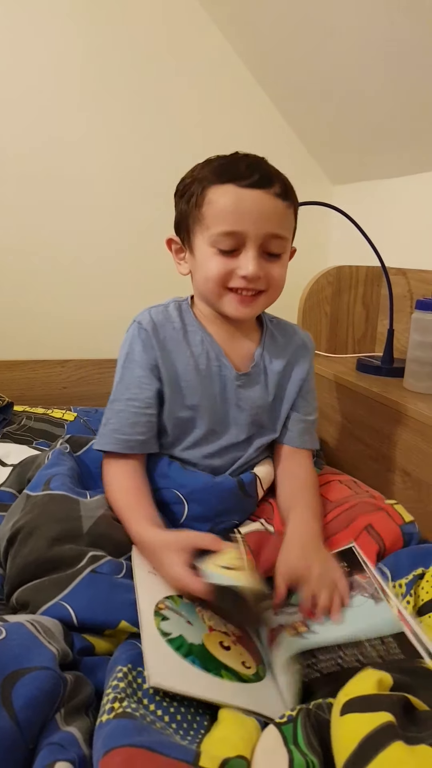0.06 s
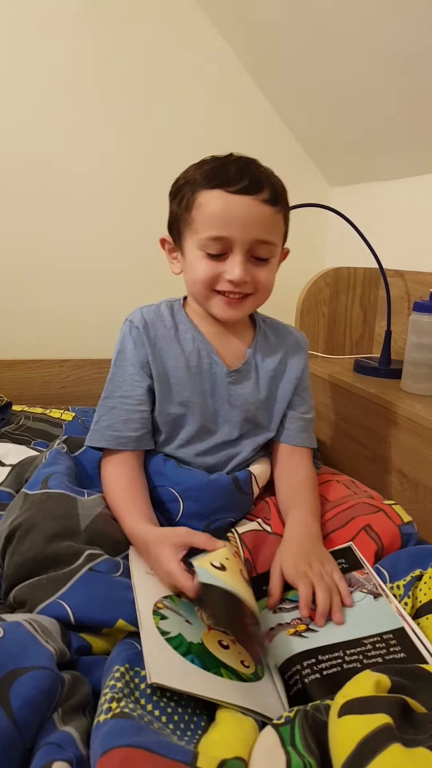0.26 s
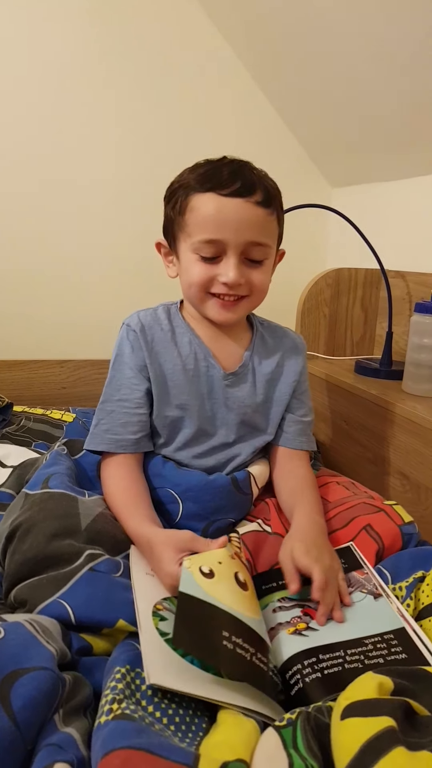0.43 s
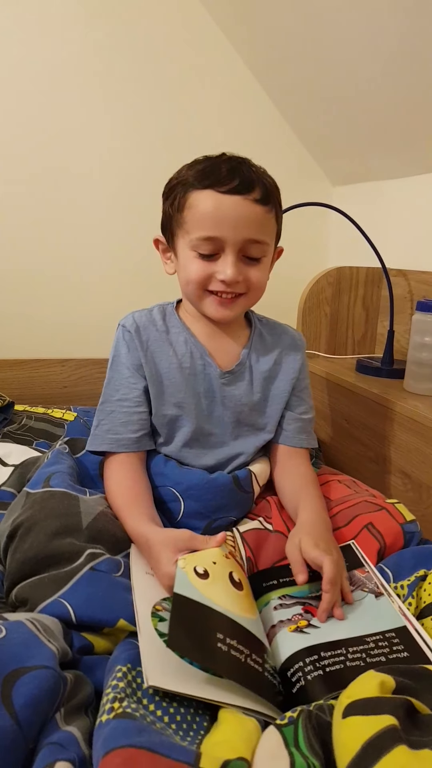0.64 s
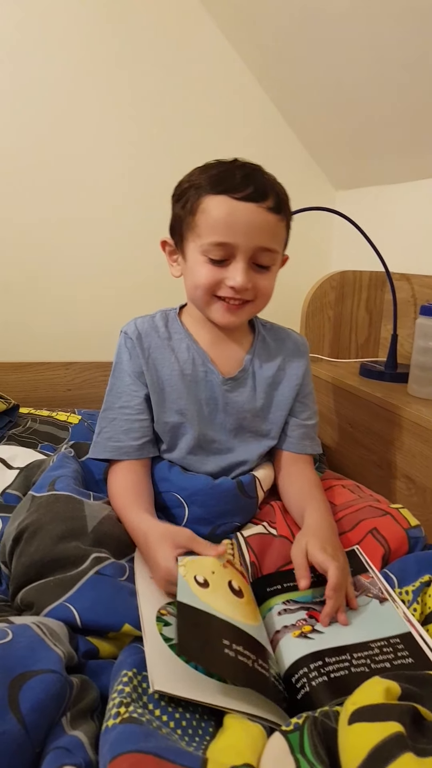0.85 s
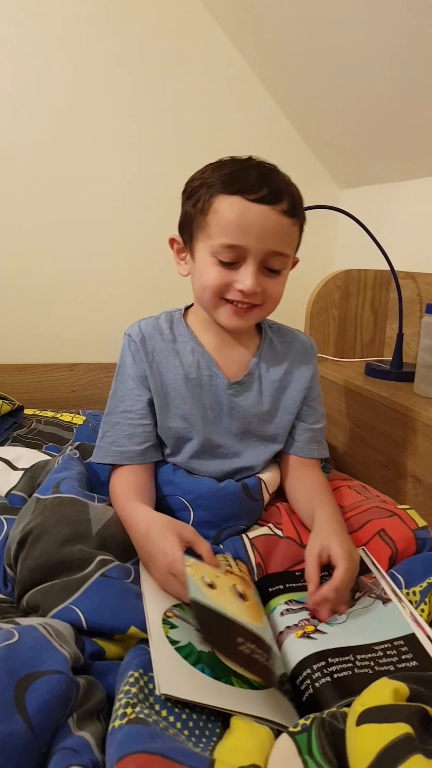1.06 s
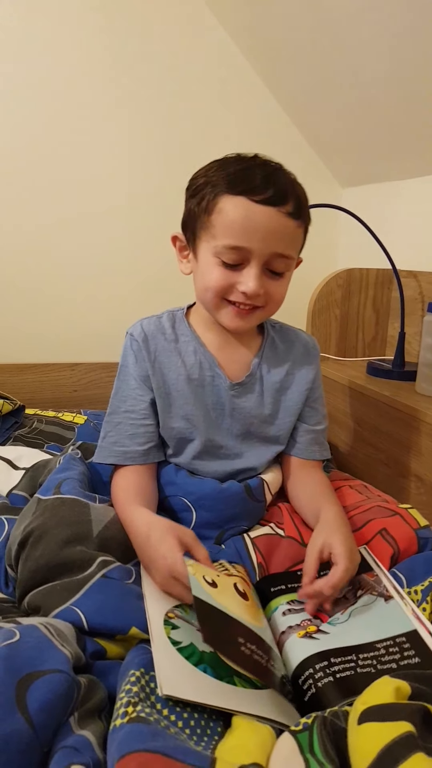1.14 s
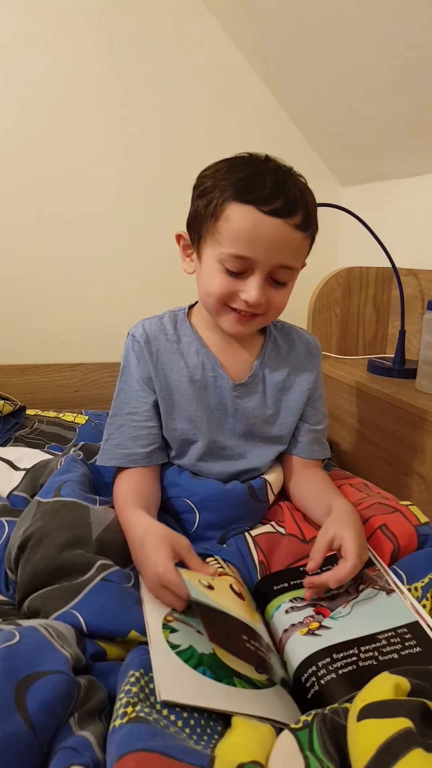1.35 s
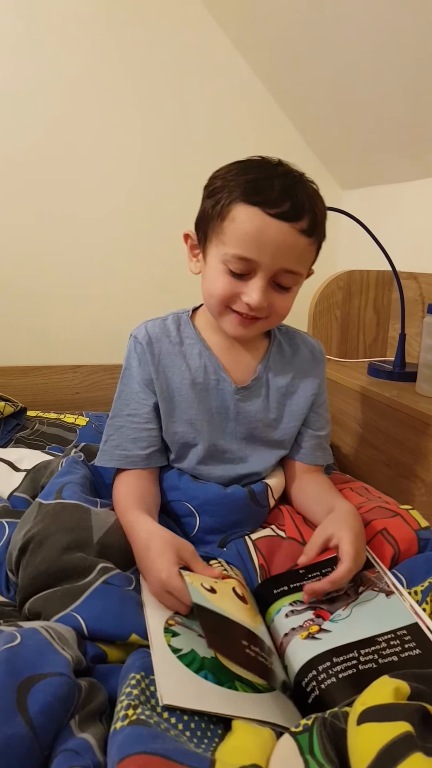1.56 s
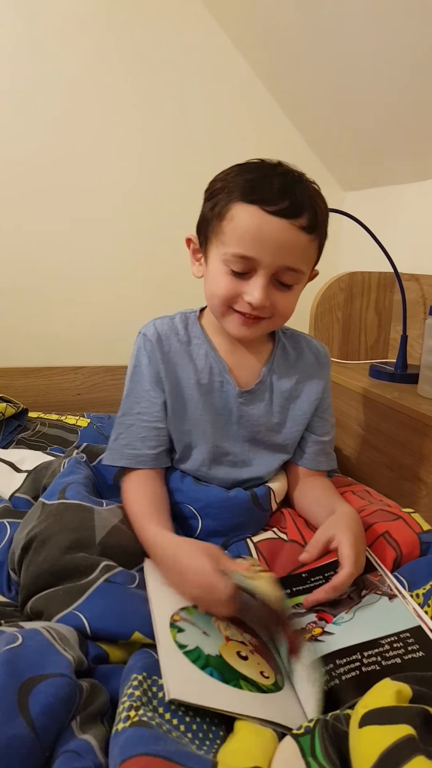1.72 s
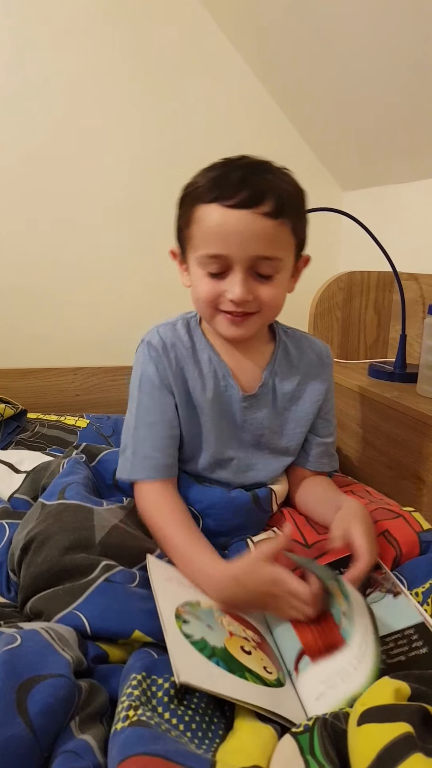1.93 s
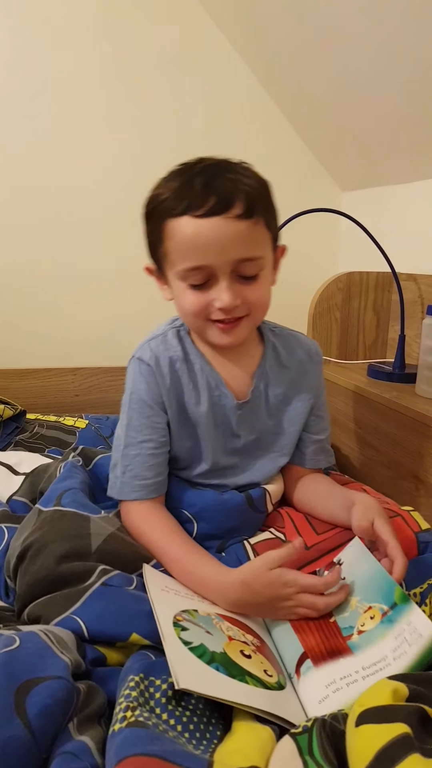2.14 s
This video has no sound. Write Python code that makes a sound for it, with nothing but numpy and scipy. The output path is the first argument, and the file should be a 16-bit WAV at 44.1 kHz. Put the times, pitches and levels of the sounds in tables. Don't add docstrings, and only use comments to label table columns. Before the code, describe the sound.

Thin book pages are handled on a bed: faint rubbing and small crease clicks, then denser crumpling, then louder quick page flaps. Small soft bedroom, close phone microphone, slight hiss.

```python
import sys
import numpy as np
from scipy import signal
from scipy.fft import rfft, irfft
from scipy.io import wavfile
from scipy.ndimage import uniform_filter1d, map_coordinates

SR = 44100
rng = np.random.default_rng(int(sys.argv[2]) if len(sys.argv) > 2 else 0)


def to_linear_factor(level_db):
    exponent = np.asarray(level_db, float) / 20
    return 10 ** exponent


def generate_wav(sig):
    pcm = np.round(np.clip(np.atleast_2d(sig).T, -1, 1) * 32767).astype(np.int16)
    wavfile.write(sys.argv[1], SR, pcm)


N = 96138

# t/s, level/dB, brightness/dB
RUB = [(0, -60.5, 1), (0.029, -61.5, -13), (0.099, -64, -3.5), (.16, -84, -11), (.232, -108, -14),
       (.25, -73.5, 11), (0.409, -63.5, -6.5), (.68, -72.5, -7.5), (.83, -57, 1.5), (1.001, -72.5, 7.5),
       (1.16, -72.5, 7), (1.318, -58, 3.5), (1.43, -75, -7.5), (1.65, -74, -3.5), (1.72, -48.5, 5.5),
       (1.825, -57, 4), (1.879, -42.5, 4.5), (1.96, -57, 12)]
# t/s, body/dB, thump/dB, crack/dB, fizz/dB
SNAPS = [(.018, -87, -67, -75, -49.5), (0.0575, -44, -67, -63, -66), (0.0801, -38, -60, -61.5, -56),
         (0.244, -55.5, -66, -72.5, -60), (0.335, -74, -83, -86, -77), (0.3614, -52, -87, -65, -81),
         (0.401, -41.5, -74, -64, -67), (0.4407, -33.5, -45.5, -53.5, -63),
         (0.4821, -34, -41.5, -50.5, -67), (0.5818, -37.5, -42.5, -55, -67), (0.738, -52, -66, -63, -82),
         (0.7861, -35.5, -50, -46, -61), (0.8169, -39.5, -47, -65, -70), (0.9021, -43.5, -80, -77, -46),
         (1.0511, -49, -61, -93, -84), (1.4993, -32.5, -48.5, -49.5, -64),
         (1.5585, -26.5, -45.5, -48.5, -55), (1.671, -28.5, -43, -49.5, -51)]
# t/s, level/dB
RUMBLE = [(0.0, -91), (0.07, -54.5), (0.21, -78.5), (0.41, -82), (0.49, -52.5), (0.54, -67.5),
          (0.59, -62.5), (0.72, -68.5), (0.82, -100), (1.01, -74.5), (1.4, -74), (1.58, -58), (1.7, -76),
          (1.77, -65), (1.92, -64), (2.18, -71.5)]
# t/s, level/dB, thump/dB, crack/dB, spread/s
CRUMPLES = [(0.26, -60, -23, -4, .002), (0.341, -63, -29, -25, 0.0078), (.378, -57, -15, -11, .01),
            (.42, -57, -15, -20, 0.0057), (.615, -56.5, -10, -24, 0.014), (.7557, -59.5, -16, -10, 0.0035),
            (.82, -50, -14, -15, 0.0014), (.848, -50, 2.5, -19, 0.0031), (.858, -73, 13, -15, 0.0017),
            (.9025, -52, -26, 1, 0.0048), (1.2285, -44.5, -10.5, 0, 0.0027), (1.25, -56, -18, -13, 0.0059),
            (1.277, -57, -22, -23, .005), (1.305, -40.5, -7, -10, 0.0024), (1.321, -47, -9, -23, 0.011),
            (1.3396, -35, -8, -31, 0.0015), (1.35, -56, 2, -10, 0.0026), (1.384, -43, -7, -14, 0.0018),
            (1.392, -49.5, -30, -34, 0.0025), (1.4573, -33.5, -19, -37, 0.002),
            (1.503, -36, -15, -22, 0.0026), (1.513, -34, -14, -40, .002), (1.522, -47, -8, -7, 0.0058),
            (1.5676, -30.5, -15.5, -8, 0.0019), (1.581, -39.5, -19, -23, 0.0076)]
# t/s, level/dB, thump/dB, crack/dB, spread/s
FLAPS = [(1.6928, -30, -9, -12, 0.0018), (1.736, -49, -3, -23, 0.0054), (1.76, -39, -2.5, 10, 0.0033),
         (1.845, -34, -15.5, -7.5, 0.0023), (1.855, -50.5, 9.5, 14.5, 0.00034),
         (1.894, -40.5, -26, -2, 0.0047), (1.9, -41, -17, 13.5, 0.0027), (1.919, -54, 8.5, 8, 0.022),
         (1.9738, -32.5, -10, 4, 0.0037), (2.012, -42, 7, -12, 0.00091), (2.0184, -25.5, -17, -7.5, 0.0035),
         (2.034, -31, -12.5, -18, 0.0028), (2.058, -50, -35, 4.5, 0.016)]

# thump, body, crack, fizz [level/dB]
RUB_LAYERS_DB = [-2, 6, -5, -8]
SNAP_LAYERS_DB = [18.2, 16.2, 24.1, 11]
CRUMPLE_LAYERS_DB = [1.1, 4.7, 1.5, -7]
FLAP_LAYERS_DB = [2, 0, 1.5, -19.5]

# f/Hz, level/dB
HELD_THUMP = [(110, -42.5), (250, 4.5), (450, -0.5), (700, 11.5), (950, 6.5), (1400, -40.5)]
# f/Hz, level/dB
FREE_THUMP = [(140, -19.5), (230, -0.5), (330, -7), (420, -12.5), (600, -1.5), (850, -5.5), (1400, -32)]
# f/Hz, level/dB
HELD_BODY = [(600, -14), (1120, -7), (1330, 3.5), (1550, 3.5), (2400, -0.5), (3100, -10.5), (4500, -23)]
# f/Hz, level/dB
FREE_BODY = [(600, -25.5), (1050, -9), (1300, 3), (1750, 15.5), (2450, 12.5), (2900, -3.5), (4500, -24)]
# f/Hz, level/dB
FLYING_BODY = [(600, -28.5), (1000, -8), (1400, -1.5), (2000, 5), (2700, -1.5), (3300, -2.5), (5000, -28.5)]
# f/Hz, level/dB
CRACK = [(900, -24), (2200, 8), (3200, 5), (4400, 7), (6200, -1.5), (8500, -2), (11000, -23.5)]
# f/Hz, level/dB
SWISH = [(900, -32), (2300, -12.5), (3000, 1.5), (4300, 4.5), (6200, 6.5), (8000, -1), (11000, -11)]
# f/Hz, level/dB
SLAP = [(500, -50.5), (1500, 4.5), (2400, 6.5), (3100, 4.5), (4400, 2.5), (6500, -9), (9000, -20)]
# f/Hz, level/dB
FIZZ = [(2500, -29), (6000, 9.5), (8500, 15), (11000, 11), (13500, 16.5), (15000, -0.5), (17000, -49)]
# f/Hz, level/dB
WHUMP = [(100, -18.5), (190, -3), (300, -0.5), (430, -4.5), (600, -20), (1000, -32.5)]
# f/Hz, level/dB
LOW = [(20, -73), (33, -20), (52, 7), (78, 9.5), (130, -8.5), (250, -19.5)]

# t/s, level/dB, extra delay at right port/s
ECHOES = [(.0011, -11, .0004), (.0021, -12, -.0005), (.0085, -16, -.0002), (.0135, -19, .0003),
          (.019, -21, -.0004)]
# f/Hz, t60/s
ROOM = [(200, .22), (1000, .24), (4000, .2), (12000, .14)]
# f/Hz, level/dB
RIGHT = [(60, 4), (200, 3), (400, -1.5), (800, -2), (1700, 3), (2400, -.5), (3300, 0), (4800, 5), (7000, 5),
         (8800, -3), (13000, 5)]
# f/Hz, level/dB per Hz
HISS = [(60, -9.5), (200, -7.5), (700, -15), (1400, -6.5), (3200, -12.5), (5000, -14), (8500, -24.5),
        (14000, -16)]

HELD_FROM_S, HELD_TO_S, FLIES_S, LANDS_S = .05, 1.15, 1.65, 1.955
GRAIN_DB, GRAINS_PER_S, CLUMP_DB, BRUSH = 2.4, 3500, 2.5, .4
RUB_END_S, RUB_FADE_DB_PER_S = 2.043, 302
SNAP_RISE_S, SNAP_FALL_S, SPLINTERS = .0003, .003, .09
REBOUND_S, REBOUND_SPREAD, REBOUND = .0034, .04, 1.35
WHUMP_S, WHUMP_WIDTH_S, WHUMP_DB = 0.037, 0.021, -50.5
FIZZ_PER_CRACK = 2.38
ROOM_DB = -15
SHARED_BELOW_HZ, MIC_LOW_HZ, EDGE_HZ = 900, 42, 15400
CAVITY_HZ, CAVITY_WIDTH_HZ, CAVITY_DB = 1340, 170, 3.5
LAG_S, LAG_WANDER_S = .00028, .00005
HISS_DB, GATE_DB, GATE_KNEE_DB, GATE_S = -66.5, -6.5, -63, 0.022


def read(points, hz):
    f, value = np.transpose(points)
    return np.interp(np.log(hz + 1), np.log(f + 1), value)


def colour(x, points, lag_s=0.):
    hz = np.fft.rfftfreq(4096, 1 / SR)
    cep = irfft(read(points, hz) * np.log(10) / 20)
    cep[1:2048] *= 2
    cep[2049:] = 0
    taps = irfft(np.exp(rfft(cep) - 2j * np.pi * hz * lag_s))
    return signal.oaconvolve(x, taps)[:N], np.linalg.norm(taps)


def shape_noise(x, points):
    shaped, norm = colour(x, points)
    return shaped / norm


def sheet(drive):
    t = np.arange(N) / SR
    thump, body, crack, fizz = drive
    held = (t > HELD_FROM_S) & (t < HELD_TO_S)
    flying, landed = t > FLIES_S, t > LANDS_S
    parts = [
        (thump * held, HELD_THUMP),
        (thump * ~held, FREE_THUMP),
        (body * held, HELD_BODY),
        (body * (~held & ~flying), FREE_BODY),
        (body * flying, FLYING_BODY),
        (crack * ~flying, CRACK),
        (crack * (flying & ~landed), SWISH),
        (crack * landed, SLAP),
        (fizz, FIZZ),
    ]
    return sum(shape_noise(x, points) for x, points in parts)


def rubbing():
    t = np.arange(N) / SR
    size = to_linear_factor(GRAIN_DB * np.minimum(rng.exponential(1, N), 3.5))
    size *= rng.random(N) < GRAINS_PER_S / SR
    clump = uniform_filter1d(rng.standard_normal(N), 300)
    slips = (size + BRUSH) * rng.standard_normal(N) * to_linear_factor(CLUMP_DB * clump / clump.std())
    at_s, level_db, bright_db = np.transpose(RUB)
    level = np.interp(t, at_s, level_db) - RUB_FADE_DB_PER_S * np.maximum(t - RUB_END_S, 0)
    tilt = np.outer([-1, 0, 1, 1], np.interp(t, at_s, bright_db))
    gain_db = level + tilt + np.array(RUB_LAYERS_DB)[:, None]
    return sheet(slips / slips.std() * to_linear_factor(gain_db))


def add_clicks(drive, s, levels_db, rise_s, fall_s, clump_db, lead=0.):
    span = np.arange(-1024, 2048)
    u = span / SR
    clicks = rng.standard_normal(3072) * to_linear_factor(clump_db * np.repeat(rng.standard_normal(384), 8))
    shape = np.exp(np.where(u < 0, u / abs(rise_s), -u / abs(fall_s)))
    clicks *= shape * np.linalg.norm(shape) / np.linalg.norm(shape * clicks)
    clicks[1024] += lead
    rebound_s = REBOUND_S * (1 + REBOUND_SPREAD * rng.uniform(-1, 1))
    clicks[1024 + round(rebound_s * SR)] += REBOUND * lead
    at = round(s * SR) + span
    drive[:, at[at >= 0]] += to_linear_factor(levels_db)[:, None] * clicks[at >= 0]


def snaps():
    drive = np.zeros((4, N))
    for s, body_db, thump_db, crack_db, fizz_db in SNAPS:
        levels_db = np.array([thump_db, body_db, crack_db, fizz_db]) + SNAP_LAYERS_DB
        levels_db = levels_db + 20 * np.log10(SPLINTERS)
        add_clicks(drive, s, levels_db, SNAP_RISE_S, SNAP_FALL_S, 5.0, 1 / SPLINTERS)
    return drive


def whump():
    t = np.arange(N) / SR
    puff = np.exp(-.5 * ((t - WHUMP_S) / WHUMP_WIDTH_S) ** 2)
    return to_linear_factor(WHUMP_DB) * shape_noise(rng.standard_normal(N) * puff, WHUMP)


def rumble():
    level_db = np.interp(np.arange(N) / SR, *np.transpose(RUMBLE))
    return shape_noise(rng.standard_normal(N), LOW) * to_linear_factor(level_db)


def crumples():
    drive = np.zeros((4, N))
    for s, db, thump_db, crack_db, spread_s in CRUMPLES:
        levels_db = db + np.array([thump_db, 0, crack_db, crack_db]) + CRUMPLE_LAYERS_DB
        add_clicks(drive, s, levels_db, spread_s * .6, spread_s, 3.5)
    return drive


def flaps():
    drive = np.zeros((4, N))
    for s, db, thump_db, crack_db, spread_s in FLAPS:
        levels_db = db + np.array([thump_db, 0, crack_db, FIZZ_PER_CRACK * crack_db]) + FLAP_LAYERS_DB
        add_clicks(drive, s, levels_db, spread_s * 1.33, spread_s, 2.5)
    return drive


def room(x):
    taps = np.zeros((2, SR // 2))
    at = np.arange(100, SR // 2 - 20, 20)
    places = at + rng.integers(0, 20, (2, len(at)))
    np.put_along_axis(taps, places, rng.choice([-1., 1.], (2, len(at))), 1)
    hz, t, z = signal.stft(taps, SR, nperseg=256)
    decay = to_linear_factor(-60 * t / read(ROOM, hz)[:, None])
    tail = signal.istft(z * decay, SR, nperseg=256)[1]
    tail[1] += signal.lfilter(*signal.butter(2, SHARED_BELOW_HZ, fs=SR), tail[0] - tail[1])
    early = np.zeros_like(tail)
    early[:, 0] = 1
    for s, db, extra_s in ECHOES:
        early[[0, 1], [round(s * SR), round((s + extra_s) * SR)]] = to_linear_factor(db)
    both = early / np.linalg.norm(early[0]) + to_linear_factor(ROOM_DB) * tail / np.linalg.norm(tail[0])
    return signal.fftconvolve(x[None], both, axes=1)[:, :N]


def scene():
    pages = sheet(snaps() + crumples() + flaps())
    return room(rubbing() + pages + whump()) + rumble()


def right_port(x):
    r = np.exp(-np.pi * CAVITY_WIDTH_HZ / SR)
    w = 2 * np.pi * CAVITY_HZ / SR
    ring = signal.lfilter([1 - r, 0, r - 1], [1, -2 * r * np.cos(w), r * r], x)
    low = signal.filtfilt(*signal.butter(3, SHARED_BELOW_HZ, fs=SR), x)
    high = x - low + to_linear_factor(CAVITY_DB) * ring
    return colour(low, RIGHT, LAG_S / 4)[0] + colour(high, RIGHT, LAG_S)[0]


def gated_hiss(ports):
    hiss = np.array([shape_noise(rng.standard_normal(N), HISS) for _ in ports])
    bright = np.diff(ports[1], prepend=0) ** 2
    power_db = 10 * np.log10(abs(uniform_filter1d(bright, round(GATE_S * SR))) + 1e-14)
    gate = to_linear_factor(GATE_DB / (0.5 + np.exp((power_db - GATE_KNEE_DB) / 2.0)))
    return to_linear_factor(HISS_DB + 9) * gate * hiss


def band_limit(x):
    return signal.sosfilt(signal.butter(12, 16490, fs=SR, output="sos"), x)


def record(dry):
    ports = to_linear_factor(-2.5) * np.array([dry[0], right_port(dry[1])])
    wander = uniform_filter1d(rng.standard_normal(N), 2500)
    read_at = np.arange(N) + LAG_WANDER_S * SR * wander / wander.std()
    ports[1] = map_coordinates(ports[1], [read_at], order=5)
    ports = signal.lfilter(*signal.butter(2, MIC_LOW_HZ, 'high', fs=SR), ports)
    mix = ports + gated_hiss(ports)
    edge = signal.firwin(127, EDGE_HZ, window=("kaiser", 9), fs=SR)
    mix = signal.oaconvolve(mix, edge[None], "same", 1)
    return band_limit(mix)


dry = scene()
out = record(dry)
generate_wav(out)
```